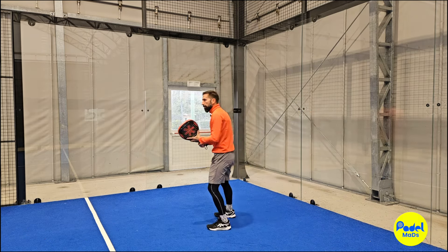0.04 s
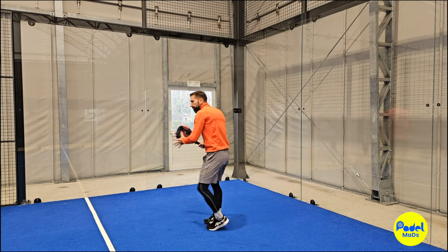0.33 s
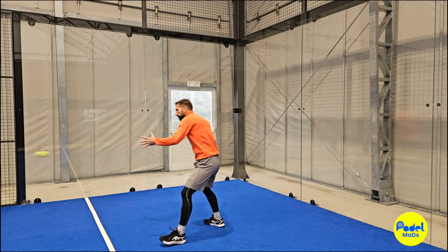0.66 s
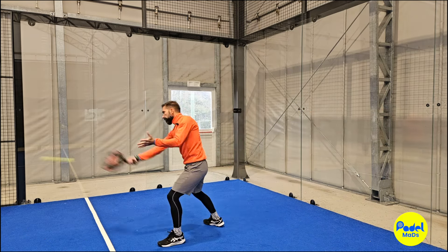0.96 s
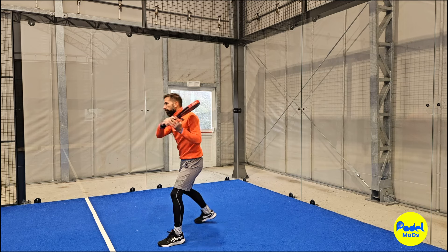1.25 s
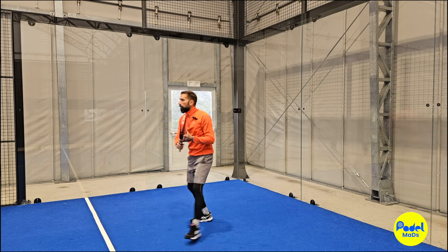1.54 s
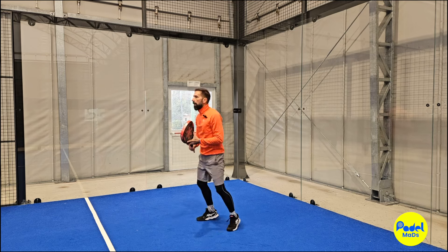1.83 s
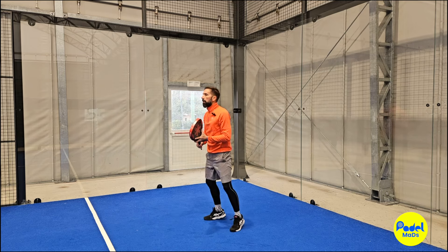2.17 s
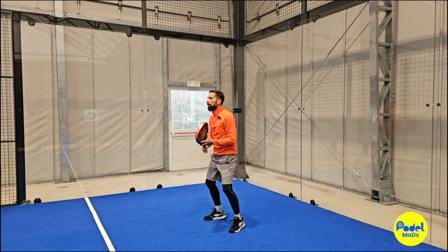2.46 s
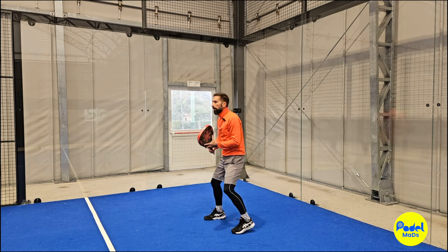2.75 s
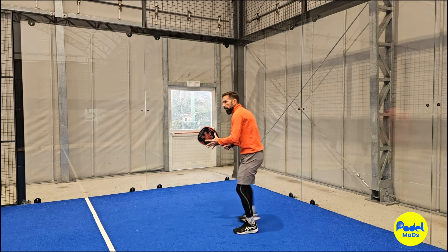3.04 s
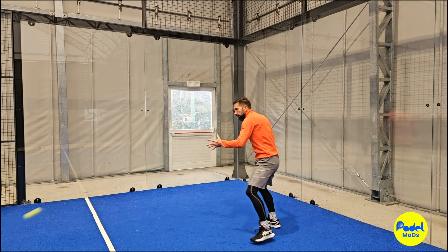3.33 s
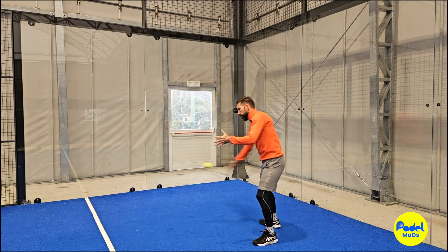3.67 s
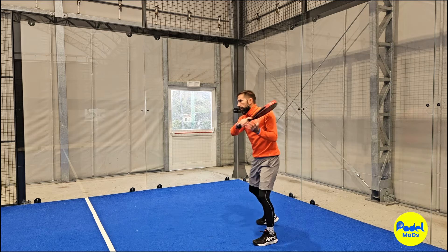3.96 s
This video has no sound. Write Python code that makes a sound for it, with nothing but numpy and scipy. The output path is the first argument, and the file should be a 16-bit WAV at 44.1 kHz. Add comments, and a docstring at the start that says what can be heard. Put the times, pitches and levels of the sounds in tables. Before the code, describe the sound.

Three padel hits ring through a big, bare hall: near, farther away, then near again. Between them, a microphone worn by one player picks up soft steps on turf, rustling cloth and a ticking zip.

```python
"""A padel rally in a large bare hall, heard from a microphone worn by one player.
The hall still rings from an earlier stroke as feet knock on turf, his jacket rustles and its zip ticks.
At 1 s his own stroke overloads the microphone; glass walls slap back and the hall rings on.
Knocks and jacket bumps lead to his partner's stroke from across the court at 2.3 s.
After more footwork he hits again at 3.8 s. Steady hall air lies under it all."""
import sys
import numpy as np
from scipy import signal
from scipy.fft import rfft, irfft, next_fast_len
from scipy.io import wavfile
from scipy.ndimage import map_coordinates

SR = 44100
rng = np.random.default_rng(int(sys.argv[2]) if len(sys.argv) > 2 else 0)


def inscribe(sig):
    """Save sig as 16-bit PCM at rate SR to the path in sys.argv[1].

    A 1-D sig is mono; a 2-D sig holds one channel per row.
    Samples are clipped to [-1, 1] before scaling.
    """
    pcm = np.round(np.clip(np.atleast_2d(sig).T, -1, 1) * 32767)
    wavfile.write(sys.argv[1], SR, pcm.astype(np.int16))


N = 176400


def own_strokes():
    """Close, hard hits, answered by turf, glass and roof."""
    # strokes (time [s], direct level [dB], hall level [dB], pitch factor, hall hold [s])
    hits = [(1.0301, 1.5, -20.6, 1.0, .23), (3.8420, .5, -18.5, .9, .2)]
    # reflections (delay [s], level against the direct sound [dB])
    echoes = [(.0042, -3.5), (.0102, -8.5), (.0135, -6.5), (.0178, -14), (.040, -15), (.063, -14),
              (.109, -15), (.147, -12), (.164, -7), (.169, -7.5), (.212, -13)]
    # hall colour (frequency at pitch factor 1 [Hz], relative level [dB])
    colour = [(30, -56), (100, -29), (190, -15), (330, -6), (470, -8.5), (700, -2), (1100, 0), (1400, -7),
              (1800, -6.5), (2650, -19), (3800, -18.5), (5060, -31), (6500, -34), (9000, -48), (15000, -52)]
    return strokes(hits, echoes, colour, direct_hz=11000, echo_hz=4200)


def partner_strokes():
    """Hits from across the court: duller, with reflections that rival the direct sound."""
    # strokes (time [s], direct level [dB], hall level [dB], pitch factor, hall hold [s])
    hits = [(-.85, -14, -16.9, 1.17, .25), (2.3248, -6, -18.6, .85, .26)]
    # reflections (delay [s], level against the direct sound [dB])
    echoes = [(.007, .5), (.0095, -3), (.0228, 3), (.028, -3), (.0365, -4), (.0405, 4), (.047, 0),
              (.054, -2), (.102, 2.5), (.108, -2), (.117, -2), (.129, -3), (.135, -3), (.168, -8),
              (.186, -3), (.192, -1)]
    # hall colour (frequency at pitch factor 1 [Hz], relative level [dB])
    colour = [(30, -56), (120, -32), (230, -19), (350, -8), (510, -10.5), (800, 0), (1040, -1.5),
              (1580, -6.5), (2130, -9.5), (2950, -18), (4480, -21), (5800, -30), (7400, -34), (9800, -49),
              (16000, -53)]
    return strokes(hits, echoes, colour, direct_hz=7000, echo_hz=4000)


def strokes(hits, echoes, colour, direct_hz, echo_hz):
    """Each hit is a pock, its slapbacks and a hall tail; distance and walls dull the pock."""
    out = np.zeros(N)
    for start, db, hall_db, pitch, hold in hits:
        add(out, start, amp(db) * lowpass(pock(pitch), direct_hz))
        for delay, echo_db in echoes:
            slap = lowpass(pock(pitch * (1 + rng.normal(0, .04))), echo_hz)
            add(out, start + delay, amp(db + echo_db) * slap)
        tail = hall([(hz * pitch, level) for hz, level in colour], hold)
        add(out, start, amp(hall_db) * tail)
    return out


def pock(pitch):
    """The ball squashes against the racket and both ring; little of the pock below 260 Hz is heard."""
    # racket and ball modes (frequency at pitch factor 1 [Hz], level [dB], t60 [s])
    modes = [(350, -18, .038), (610, -12, .022), (820, -6, .024), (960, -2, .024), (1230, -7, .017),
             (1850, -9, .013), (2850, -14, .012), (3450, -13, .012), (4300, -15, .012)]
    t = np.arange(SR // 10) / SR
    contact_s = .0006
    hit = ring(modes, t, pitch, click_db=-12, click_t60=.01, click_hz=11000) * attack(t, contact_s)
    return signal.lfilter(*signal.butter(2, 260, "highpass", fs=SR), hit)


def hall(colour, hold):
    """Clumped echoes build up, hold while they cross the hall, then die quickly at first, slowly later."""
    # hall decay (frequency [Hz], t60 [s])
    decay = [(100, 1.3), (280, 1.7), (600, 2.2), (1100, 3.1), (1900, 2.8), (4000, 2.0), (7000, 1.35),
             (14000, 1.1)]
    clump_db, late_power = 2.2, amp(-3.3) ** 2
    t = np.arange(3 * SR) / SR
    clumps = np.interp(t, np.arange(600) / 200, rng.standard_normal(600))
    wash = noise(colour, len(t)) * amp(clump_db * clumps * fade(t, t60=4))
    hz, times, spectrum = signal.stft(wash, SR, nperseg=512)
    age = np.maximum(times - hold, 0)
    early_drop = np.sqrt(late_power + (1 - late_power) * fade(age, t60=.8) ** 2)
    gain = fade(age, along(decay, hz)[:, None]) * early_drop
    tail = signal.istft(spectrum * gain, SR, nperseg=512)[1][:len(t)]
    return tail * attack(t, rise_s=.03)


def knocks():
    """Feet and soft bounces land as a damped thud with a scuff of turf."""
    # landings (time [s], pitch [Hz], relative thud level [dB], relative scuff level [dB])
    landings = [(.3938, 330, -28, -30), (.407, 330, -27, -37), (.491, 330, -29, -32),
                (.5615, 600, -25, -29), (.887, 480, -33, -39), (1.818, 210, -31, -32),
                (1.891, 260, -38, -48), (1.946, 560, -15, -23), (2.1195, 280, -24, -36),
                (2.204, 260, -42, -46), (2.253, 230, -43, -46), (3.3355, 560, -26, -24),
                (3.379, 260, -38, -29), (3.387, 700, -34, -34), (3.393, 1000, -32, -37),
                (3.594, 800, -35, -40)]
    # scuff colour (frequency [Hz], relative level [dB])
    turf = [(25, -30), (60, -10), (180, -2), (400, -4), (1200, -2), (2500, -12), (4000, -12), (5200, -22),
            (7000, -23), (9000, -33), (15000, -39)]
    out, t = np.zeros(N), np.arange(SR // 8) / SR
    thud_cycles = 7
    for start, hz, thud_db, scuff_db in landings:
        thud = amp(thud_db) * np.sin(2 * np.pi * hz * t) * fade(t, t60=thud_cycles / hz)
        scuff = amp(scuff_db) * noise(turf, len(t)) * fade(t, t60=.02)
        add(out, start, 2 * (thud + scuff) * attack(t, rise_s=.0007))
    return out


def zip_pull():
    """The small metal tab ticks when the player is jolted."""
    # ticks (time [s], level [dB])
    ticks = [(.066, -21), (.5615, -14), (1.1425, -30), (1.8195, -30), (1.9465, -26), (1.969, -37),
             (2.071, -42), (2.1200, -17), (2.141, -40), (2.3965, -15), (2.4500, -27), (2.5115, -14),
             (2.5245, -20), (3.1605, -31), (3.336, -30), (3.379, -33), (3.950, -26), (3.959, -28)]
    # tab modes (nominal frequency [Hz], level [dB], t60 [s])
    modes = [(5700, -7, .008), (6250, -2, .009), (6650, -4, .008), (7800, -15, .006)]
    out, t = np.zeros(N), np.arange(SR // 10) / SR
    for start, db in ticks:
        pitch = 1 + rng.normal(0, .025)
        tick = ring(modes, t, pitch, click_db=-10, click_t60=.014, click_hz=9500)
        add(out, start, amp(db) * tick * attack(t, rise_s=.0005))
    return out


def jacket():
    """Low bumps on the microphone, and grainy brushing as cloth catches and slips unevenly."""
    # jacket bumps (middle [s], half length [s], level [dB])
    bumps = [(.578, .018, -42), (.79, .035, -45), (.9, .03, -50), (1.01, .04, -48), (1.755, .015, -47),
             (1.825, .015, -46), (1.935, .025, -44), (2.02, .05, -47), (2.27, .04, -47), (2.42, .08, -46),
             (3.265, .02, -45), (3.33, .025, -41), (2.97, .06, -53), (3.83, .05, -49)]
    # bump colour (frequency [Hz], relative level [dB])
    rumble = [(20, -32), (42, -5), (62, 0), (100, -7), (170, -14), (300, -35), (1000, -80)]
    # cloth, swing and soles (middle [s], half length [s], level [dB], centre [Hz], width [octaves])
    brushes = [(.076, .008, -41, 8200, .35), (.08, .2, -56, 14000, .7), (.3, .2, -55, 6600, .45),
               (.47, .022, -49, 4800, .6), (.8, .11, -56, 6300, .22), (.85, .17, -58, 11000, .7),
               (.805, .018, -44, 3900, .35), (1.0, .05, -49, 12500, .6), (1.0, .045, -43.5, 3000, 1.0),
               (1.49, .011, -45.5, 6600, .25), (1.55, .02, -55, 8000, .5), (1.97, .012, -49, 4800, .6),
               (2.271, .01, -47, 5900, .25), (2.76, .085, -51, 9500, .8), (2.82, .12, -49, 5000, .5),
               (3.265, .018, -41, 3900, .36), (3.25, .04, -55, 8500, .7), (3.82, .06, -48, 3200, .9),
               (3.83, .06, -55, 12000, .7)]
    catch_db, catches_per_s = 1.8, 110
    out = noise(rumble, N) * sum(amp(db) * swell(middle, half) for middle, half, db in bumps)
    catch_position = np.arange(N) * catches_per_s / SR
    for middle, half, db, centre, octaves in brushes:
        catches = map_coordinates(rng.standard_normal(N // 100), [catch_position], order=1)
        grains = rng.standard_normal(N) * amp(4 * rng.standard_normal(N) + catch_db * catches)
        band = lambda hz: np.exp(-.5 * (np.log2((hz + 1) / centre) / octaves) ** 2)
        out += amp(db) * swell(middle, half) * unit(filtered(grains, band))
    return out


def hall_air():
    """A quiet, steady bed of room tone."""
    # air colour (frequency [Hz], relative level [dB])
    colour = [(20, -40), (35, -21), (60, -8), (100, -10), (180, -8), (330, -5), (500, -6), (800, -2),
              (1150, 0), (1800, -5), (2600, -18), (4000, -17), (5100, -27), (6300, -24), (9000, -33),
              (15500, -36)]
    return amp(-43) * noise(colour, N)


def ring(modes, t, pitch, click_db, click_t60, click_hz):
    """Struck modes under a short click."""
    tones = sum(amp(db + rng.normal(0, 1)) * fade(t, t60) * np.sin(2 * np.pi * hz * pitch * t)
                for hz, db, t60 in modes)
    click = lowpass(fade(t, click_t60) * rng.standard_normal(len(t)), click_hz, order=3)
    return tones + amp(click_db) * click


def amp(db):
    """Decibels to gain."""
    return 10 ** (np.asarray(db) / 20)


def unit(x):
    """Scaled to rms 1."""
    return x / np.sqrt(np.mean(x ** 2) + 1e-20)


def along(points, hz):
    """(Hz, value) points read on a log axis."""
    freqs, values = np.transpose(points)
    return np.interp(np.log(hz + 1), np.log(freqs + 1), values)


def lowpass(x, hz, order=2):
    """Roll off the treble above hz."""
    return signal.lfilter(*signal.butter(order, hz, fs=SR), x)


def filtered(x, response):
    """x shaped by a frequency response."""
    size = next_fast_len(len(x) + SR // 4)
    return irfft(rfft(x, size) * response(np.fft.rfftfreq(size, 1 / SR)), size)[:len(x)]


def noise(spectrum, size):
    """Coloured noise of rms 1."""
    return unit(filtered(rng.standard_normal(size), lambda hz: amp(along(spectrum, hz))))


def attack(t, rise_s):
    """Exponential rise to 1."""
    return 1 - np.exp(-t / rise_s)


def fade(t, t60):
    """Exponential decay."""
    return np.exp(-np.log(1000) * t / t60)


def swell(middle, half):
    """A bell-shaped rise and fall."""
    return np.exp(-.5 * ((np.arange(N) / SR - middle) / half) ** 2)


def add(out, start, x):
    """Mix x into out from start [s] on."""
    i = round(start * SR)
    x, i = x[max(-i, 0):], max(i, 0)
    out[i:i + len(x)] += x[:max(len(out) - i, 0)]


def scene():
    """Both players over the hall's steady air, in mono."""
    return (own_strokes() + partner_strokes() + knocks() + zip_pull() + jacket() + hall_air())[None]


def record(dry):
    """The microphone flattens the loudest peaks; the top end stops at 16 kHz."""
    ceiling, knee = .51, 5
    clipped = dry[0] / (1 + np.abs(dry[0] / ceiling) ** knee) ** (1 / knee)
    return filtered(clipped, lambda hz: hz < 16000)[None]


dry = scene()
out = record(dry)
inscribe(out)
```